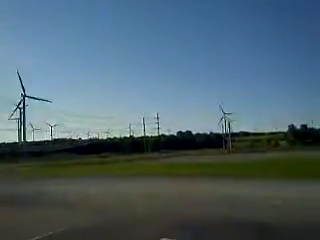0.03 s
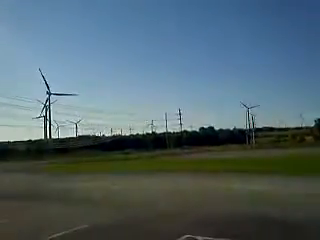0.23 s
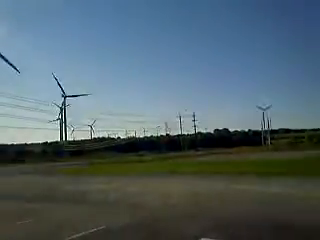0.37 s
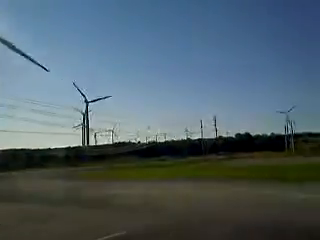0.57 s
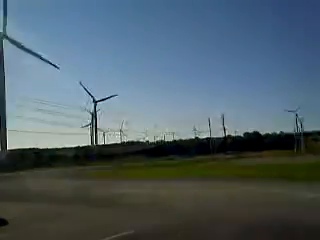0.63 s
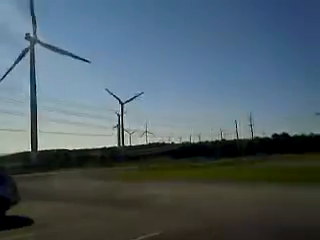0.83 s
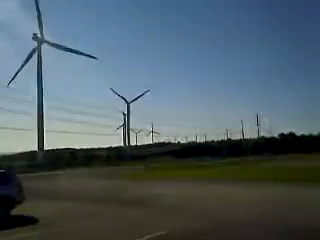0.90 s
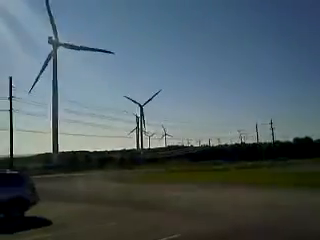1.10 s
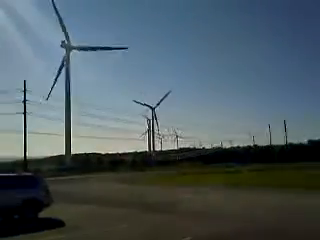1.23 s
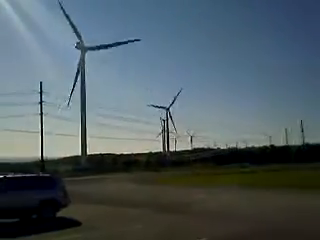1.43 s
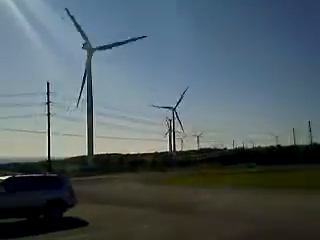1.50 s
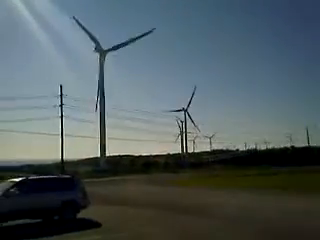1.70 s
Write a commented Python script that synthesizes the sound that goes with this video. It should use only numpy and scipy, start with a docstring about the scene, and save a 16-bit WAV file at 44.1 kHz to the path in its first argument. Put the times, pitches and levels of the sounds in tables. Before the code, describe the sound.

Wind buffets the microphone in uneven, thumping gusts over a faint road rush.

```python
"""Wind on a small microphone

Carried along a road through open fields, the microphone is buffeted by gusts: a low flutter that
brightens as they grow. The largest eddies land as single thumps, the loudest of them hard-clipped.
Under it runs a steady rush of road and air, with a brief opening whoosh, a few handling ticks and
two short scuffs."""
import sys
import numpy as np
from scipy import signal
from scipy.fft import rfft, irfft
from scipy.io import wavfile

SR = 44100
rng = np.random.default_rng(int(sys.argv[2]) if len(sys.argv) > 2 else 0)


def unload_wav(signal):
    """Save mono or channel-first audio to the path in sys.argv[1] as 16-bit WAV at rate SR, clipped to [-1, 1]."""
    wavfile.write(
        sys.argv[1],
        SR,
        np.round(np.clip(np.atleast_2d(signal).T, -1, 1) * 32767).astype(np.int16),
    )


N = 77175
TIME = np.arange(N) / SR

# large eddies striking the port (time [s], level [dB], pitch [Hz])
EDDY_HITS = [(0.0745, -17, 230), (0.2259, -6, 381), (0.3585, -7, 340), (0.4397, -7, 380),
             (.4483, -2.4, 522), (0.4643, -8, 420), (0.4704, -3.5, 470), (0.4875, -6, 400),
             (.5625, -6.5, 432), (0.5734, -4, 325), (0.5874, -2.24, 472), (0.6107, -3, 430),
             (.646, -12, 300), (.657, -14, 400), (.852, -12, 390), (0.907, -8, 300), (0.9352, -8.5, 340),
             (0.9464, -9, 390), (1.1925, -7.5, 320), (1.2178, -4.5, 290), (1.2912, -0.86, 460),
             (1.3008, -6.5, 480), (1.346, -8, 300), (1.358, -4, 390), (1.4358, -2.5, 361),
             (1.4762, -15.5, 330), (1.5148, -16.5, 428)]


def amp(db):
    """Decibels to gain."""
    return 10 ** (np.asarray(db) / 20)


def unit(x):
    """Scale to unit rms."""
    return x / np.sqrt(np.mean(x ** 2) + 1e-20)


def curve(points):
    """Linear interpolation of (time [s], value) points."""
    return np.interp(TIME, *np.transpose(points))


def colour(x, points):
    """Filter by a (frequency [Hz], gain [dB]) shape, normalised to keep the power of white noise."""
    hz, db = np.transpose(points)
    bins_hz = np.fft.rfftfreq(N, 1 / SR)
    gain = amp(np.interp(np.log(bins_hz + 1), np.log(hz), db))
    return irfft(rfft(x) * unit(gain), N)


def wander(rate_hz):
    """Random drift of unit rms, rolled off above rate_hz."""
    rolloff = 1 + (np.fft.rfftfreq(N, 1 / SR) / rate_hz) ** 4
    return unit(irfft(rfft(rng.standard_normal(N)) / rolloff, N))


def steadied(x, span_s):
    """Hold the running rms at one; flutter quicker than span_s remains."""
    lag_s = np.arange(-4000, 4001) / SR
    window = np.exp(-(2 * lag_s / span_s) ** 2)
    power = signal.fftconvolve(x ** 2, window, "same") / signal.fftconvolve(np.ones(N), window, "same")
    return x / np.sqrt(abs(power) + 1e-9)


def low_pass(x, edge_hz, taps):
    """Steep FIR band limit."""
    kernel = signal.firwin(taps, edge_hz, window=("kaiser", 8), fs=SR)
    return signal.oaconvolve(x, kernel[None], "same")


def buffeting():
    """Turbulence at the port, louder and brighter as the wind grows."""
    # wind force at the microphone (time [s], level [dB])
    gusts = [(0, -33.5), (.058, -32), (.076, -25), (.112, -37.5), (.184, -31.5), (.205, -27.5), (.245, -30),
             (.345, -25.5), (.38, -20), (.41, -25.5), (.438, -12), (.456, -19), (.505, -16), (.555, -12.5),
             (.605, -11.5), (.63, -27.5), (.70, -25.5), (.79, -30.5), (.835, -30), (.86, -22.5),
             (.935, -15), (.965, -27.5), (1.0, -25.5), (1.056, -41.5), (1.088, -20), (1.12, -33),
             (1.18, -22.5), (1.235, -22), (1.266, -18.5), (1.295, -10.5), (1.335, -17.5), (1.355, -15.5),
             (1.385, -22), (1.425, -18.5), (1.465, -25), (1.485, -18), (1.5, -39), (1.522, -25),
             (1.564, -40.5), (1.63, -25.5), (1.69, -34.5), (1.75, -30)]
    # flutter spectrum in a lull (frequency [Hz], gain [dB])
    lull_shape = [(20, -24.5), (50, -18.5), (100, -6.5), (160, 3), (250, 5.5), (390, -0.5), (550, -9.5),
                  (800, -25), (1200, -34.5), (3500, -48)]
    # flutter spectrum in a full gust (frequency [Hz], gain [dB])
    blast_shape = [(20, -43.5), (50, -20.5), (100, -12.5), (170, -6), (270, 1.5), (450, -1), (700, -7),
                   (900, -18.5), (1200, -26.5), (2000, -38.5), (3500, -50.5)]
    lull_db, blast_db = -29, -13  # wind levels at which each spectrum holds
    flutter_db, sweep_s, sweep_depth = 2.5, 0.0045, 0.8
    force_db = curve(gusts)
    eddies = rng.standard_normal(N) * amp(flutter_db * wander(rate_hz=92))
    brightness = np.clip((force_db - lull_db) / (blast_db - lull_db), 0, 1)
    flutter = (1 - brightness) * colour(eddies, lull_shape) + brightness * colour(eddies, blast_shape)
    # each large eddy briefly sweeps the small ones aside
    swept = np.max([np.exp(-((TIME - at_s) / sweep_s) ** 2) for at_s, _, _ in EDDY_HITS], axis=0)
    return amp(force_db) * steadied(flutter, span_s=0.04) * (1 - sweep_depth * swept)


def road_rush():
    """Broad, slightly flickering noise of tyres and passing air."""
    # road and air spectrum (frequency [Hz], gain [dB])
    shape = [(60, -10.5), (250, -4), (600, 9.5), (1000, 4), (1350, -0.5), (1900, -2), (2500, -3),
             (2900, -6.5), (3300, -8), (3700, -20.5), (4200, -23)]
    # slow course of the rush (time [s], level [dB])
    levels = [(0, -46), (.18, -43.5), (.28, -44), (.4, -42), (.58, -46), (.66, -45), (.82, -42),
              (.95, -45.5), (1.04, -41), (1.18, -43), (1.26, -46), (1.5, -47.5), (1.62, -45), (1.75, -43)]
    noise = colour(rng.standard_normal(N), shape)
    flicker_db = 2.78 * wander(rate_hz=42)
    return noise * amp(curve(levels) + flicker_db)


def whoosh():
    """Mid-range air noise that holds briefly and fades."""
    # air noise spectrum (frequency [Hz], gain [dB])
    shape = [(600, -14), (1000, -10.5), (1330, -1), (1650, -9), (2300, -12.5), (3500, -31.5)]
    level_db, hold_s, fade_s = -45.5, 0.22, 0.019
    envelope = amp(level_db) * np.exp(-np.maximum(TIME - hold_s, 0) / fade_s)
    return colour(rng.standard_normal(N), shape) * envelope


def thumps():
    """Each large eddy sucks at the diaphragm: a swing of 2-3 cycles, a brighter slap in the middle."""
    swell_cycles, decay_cycles = 0.86, 0.99
    slap_ratio, slap_db = 1.75, -16.5
    out = np.zeros(N)
    for at_s, level_db, pitch_hz in EDDY_HITS:
        cycles = (TIME - at_s) * pitch_hz
        width_cycles = np.where(cycles < 0, swell_cycles, decay_cycles)
        swing = np.cos(2 * np.pi * cycles) * np.exp(-(cycles / width_cycles) ** 2)
        slap = np.sin(2 * np.pi * cycles * slap_ratio) * np.exp(-cycles ** 2)
        out -= amp(level_db) * (swing + amp(slap_db) * slap)
    return out


def ticks():
    """Dry ticks of a few milliseconds, from handling and from air snapping at the casing."""
    # ticks on the casing (time [s], relative level [dB])
    hits = [(0.3563, -19.5), (0.56, -27.5), (0.6121, -18.5), (1.066, -21), (1.29, -21.5), (1.476, -24),
            (1.512, -23.5)]
    # tick spectrum (frequency [Hz], gain [dB])
    shape = [(200, -3.5), (700, -9), (1400, -2), (2500, -7.5), (3500, -20.5), (4200, -24)]
    decay_s = 0.0015
    envelope = sum(amp(db) * (TIME >= at_s) * np.exp(-abs(TIME - at_s) / decay_s) for at_s, db in hits)
    return colour(envelope * rng.standard_normal(N), shape) / 2


def scuffs():
    """Grainy friction: starts quickly, holds through the rub, dies away in the casing."""
    # rubs on the casing (time [s], level [dB], length [s])
    rubs = [(1.063, -33, 0.015), (1.125, -33.5, .013), (1.179, -41.5, .017)]
    # casing resonances (frequency [Hz], gain [dB])
    casing = [(300, -16.5), (800, 3), (1150, -4.5), (1550, -8.5), (1850, 3.5), (2100, -3), (2400, 0.5),
              (2900, -17.5), (3300, -7.5), (3800, -21), (4300, -22.5)]
    rise_s, decay_s, grain_db = 0.0013, 0.018, 2
    envelope = np.zeros(N)
    for at_s, level_db, length_s in rubs:
        rise = np.clip((TIME - at_s) / rise_s, 0, 1)
        decay = np.exp(-np.maximum(TIME - at_s - length_s, 0) / decay_s)
        envelope += amp(level_db) * rise * decay
    grains = unit(rng.standard_normal(N) * amp(grain_db * wander(rate_hz=500)))
    return colour(envelope * grains, casing)


def scene():
    """All sources at the one microphone."""
    return (buffeting() + thumps() + ticks() + scuffs() + road_rush() + whoosh())[None]


def record(dry):
    """Narrow band limit, hard clipping of the loudest thumps, final low-pass."""
    low_cut_hz, ceiling = 28, 0.71
    thinned = signal.lfilter(*signal.butter(1, low_cut_hz, "high", fs=SR), dry)
    narrow = low_pass(thinned, edge_hz=4020, taps=181)
    clipped = np.clip(narrow, -ceiling, ceiling)
    return low_pass(clipped, edge_hz=15800, taps=255)


dry = scene()
out = record(dry)
unload_wav(out)
```